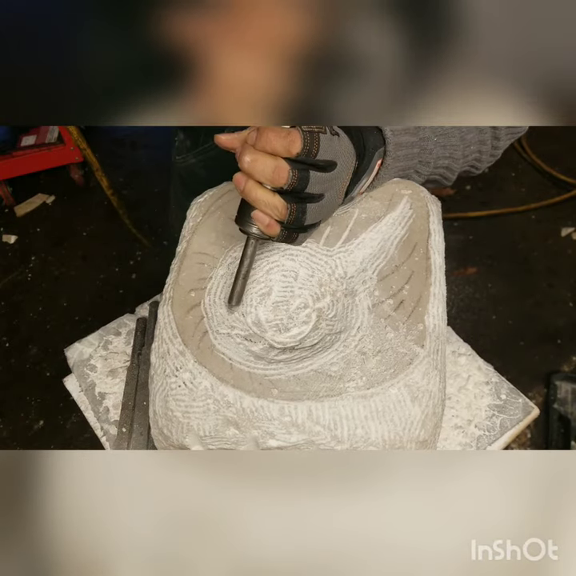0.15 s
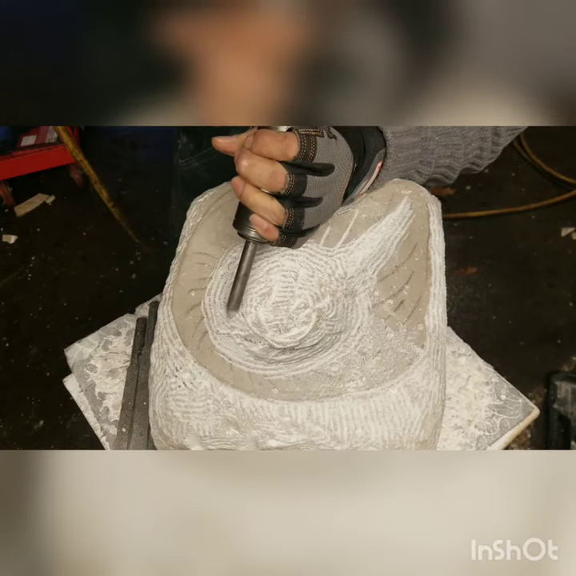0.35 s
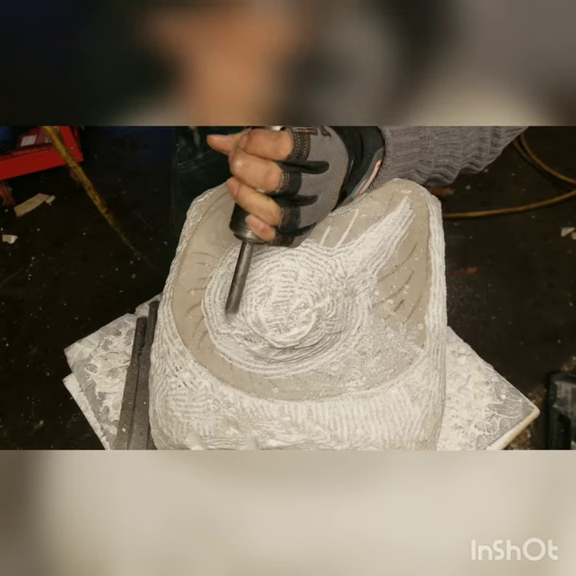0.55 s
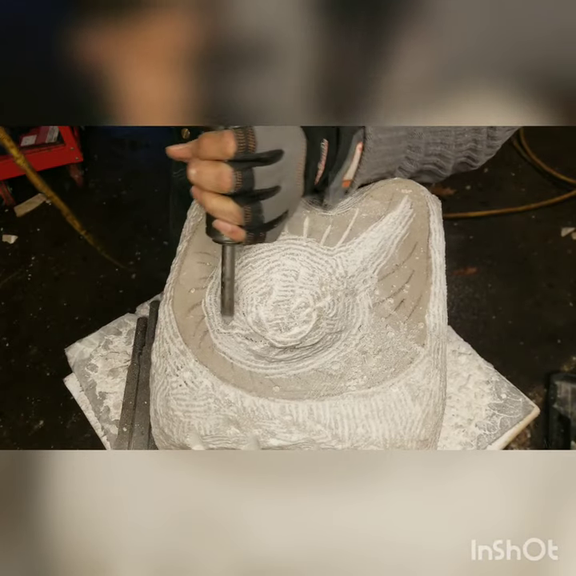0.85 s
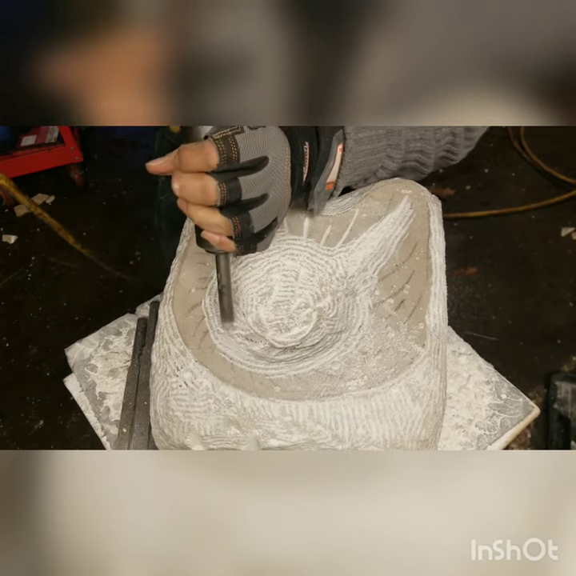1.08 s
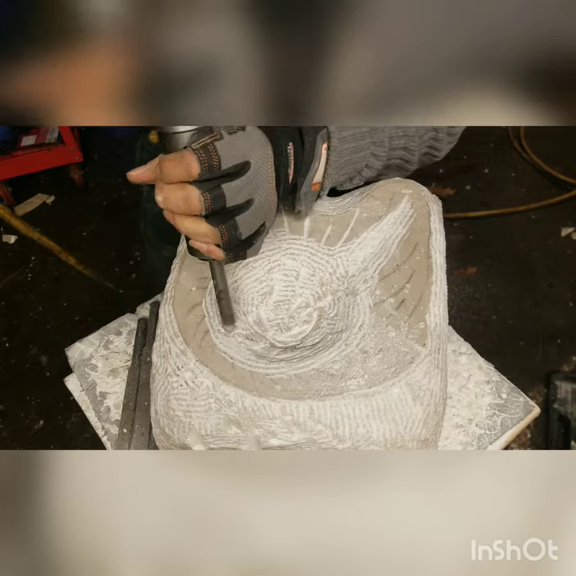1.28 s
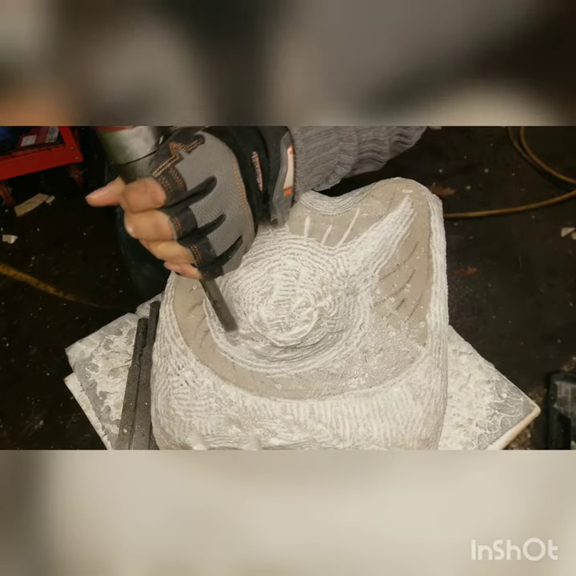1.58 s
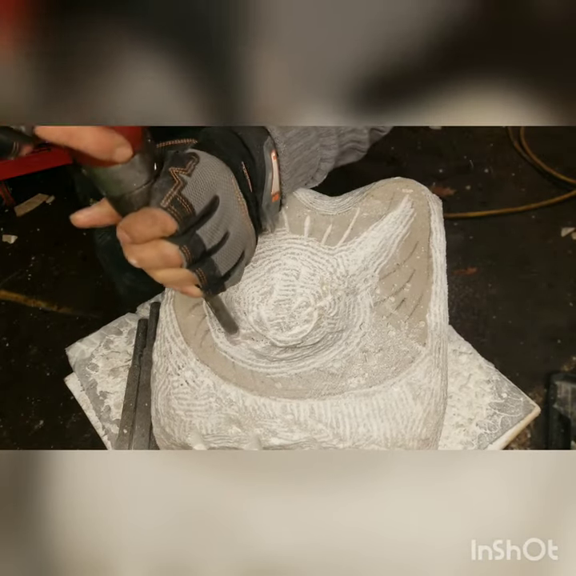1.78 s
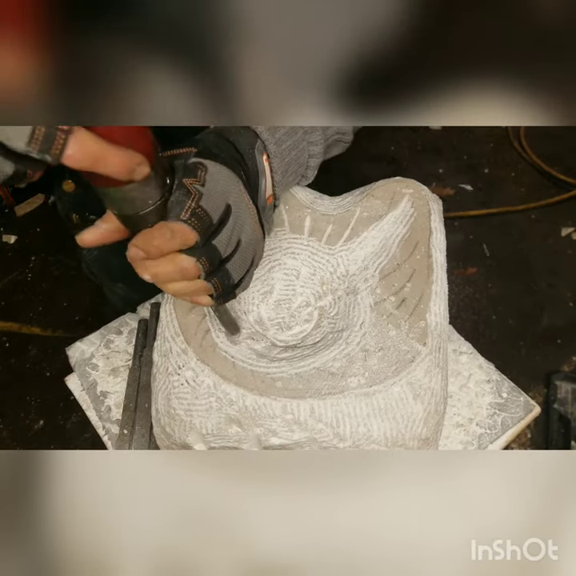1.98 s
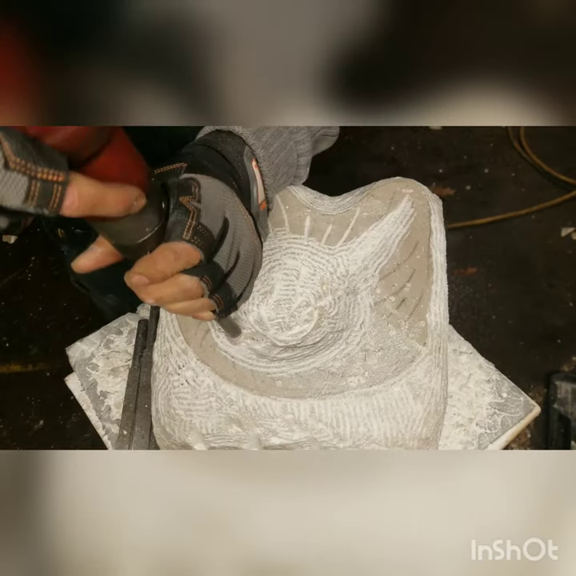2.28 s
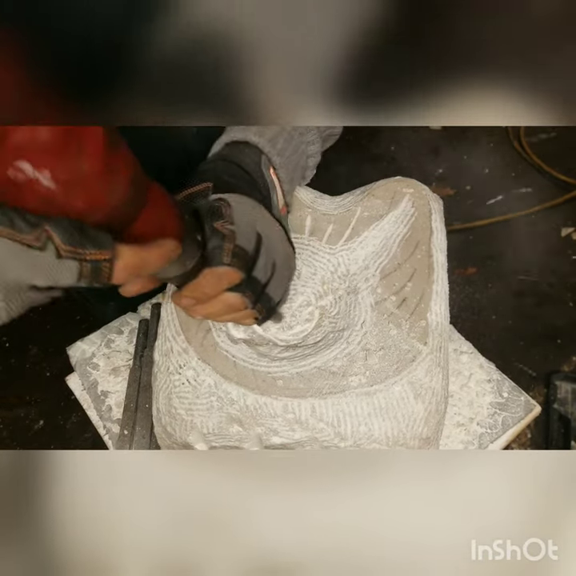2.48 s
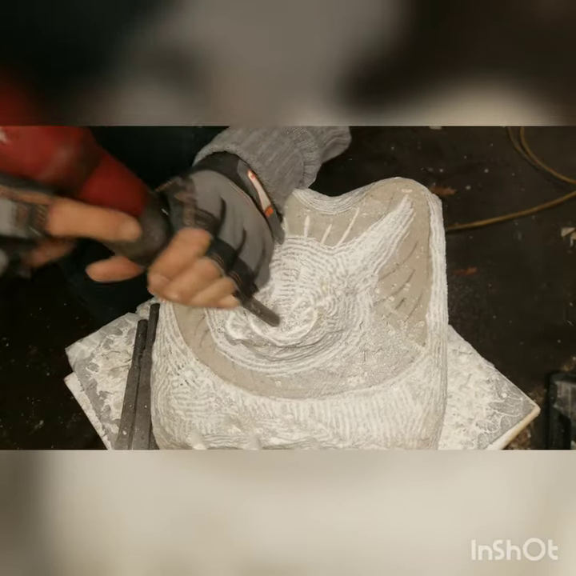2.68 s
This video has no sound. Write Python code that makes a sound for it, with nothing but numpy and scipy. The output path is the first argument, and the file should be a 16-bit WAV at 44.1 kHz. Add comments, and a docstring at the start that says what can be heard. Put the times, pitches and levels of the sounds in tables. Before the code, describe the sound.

A pneumatic hammer drives a steel chisel into stone close by in a small, booming workshop. Two short bursts lead into a longer one, thumping, cracking and ringing over hissing air, before the chisel lifts with a brief scrape.

```python
"""A pneumatic hammer drives a steel chisel into a stone block: three bursts, 23 to 29 blows a second.
It stands nearby in a small, booming workshop, heard through a stereo pair of microphones.
Every blow is a low thump of air, a dry crack of stone and a short, very high ring of steel.
Exhaust air hisses in time with the piston, and at the end the chisel lifts with a tick and a scrape."""
import sys
import numpy as np
from scipy import signal
from scipy.fft import rfft, irfft, next_fast_len
from scipy.io import wavfile

SR = 44100
rng = np.random.default_rng(int(sys.argv[2]) if len(sys.argv) > 2 else 0)


def output_pcm(signal):
    """Save a mono or channel-first signal as 16-bit PCM at the path in sys.argv[1].

    Samples are clipped to [-1, 1] before scaling.
    """
    pcm = np.clip(np.atleast_2d(signal).T, -1, 1) * 32767
    wavfile.write(sys.argv[1], SR, np.round(pcm).astype(np.int16))


N = 125685


def amp(db):
    """Decibels to gain."""
    return 10 ** (np.asarray(db) / 20)


def unit_rms(x):
    """Scale to rms 1."""
    return x / np.sqrt(np.mean(x ** 2) + 1e-20)


def at_hz(points, hz):
    """Read a curve on a log frequency axis."""
    freqs, values = np.transpose(points)
    return np.interp(np.log(hz + 1), np.log(freqs + 1), values)


def at_time(points, s, outside=None):
    """Read a curve over time; its ends hold unless an outside value is given."""
    return np.interp(s, *np.transpose(points), left=outside, right=outside)


def filtered(x, response):
    """Apply a frequency response."""
    size = next_fast_len(N + SR // 2)
    return irfft(rfft(x, size) * response(np.fft.rfftfreq(size, 1 / SR)), size)[..., :N]


def noise(colour, width):
    """Coloured stereo noise of rms 1; width is side over mid."""
    mid, side = filtered(rng.standard_normal((2, N)), lambda hz: amp(at_hz(colour, hz)))
    return unit_rms(np.array([mid + width * side, mid - width * side]))


def add(track, start_s, sound):
    """Mix a sound into a track at a time."""
    start = round(start_s * SR)
    part = track[..., start:start + sound.shape[-1]]
    part += sound[..., :part.shape[-1]]


# The quiet workshop: freq_hz, gain_db
ROOM_TONE_COLOUR = [(20, -24), (70, -2.5), (300, -35), (16000, -54)]

def room_tone(level_db=-68.5):
    """A faint, steady rumble lies under the work."""
    return amp(level_db) * noise(ROOM_TONE_COLOUR, width=0.23)


# Decay of the room: freq_hz, t60_s
REVERB_DECAY = [(260, 0.089), (700, 0.29), (6500, 0.27), (13000, 0.19)]
# What the room sends back to the microphones: freq_hz, gain_db
REVERB_COLOUR = [(100, -23), (280, -2.5), (650, -2), (1100, -4), (3000, -2), (12000, -5.5)]

def workshop_reverb(tool, predelay_s=0.007):
    """The room returns a short diffuse tail that changes as the tool moves."""
    out = np.zeros((2, N))
    for part in np.array_split(np.arange(N), 16):  # each stretch gets its own tail
        hz, t, spectrum = signal.stft(rng.standard_normal((2, SR // 2)), SR, nperseg=256)
        t60 = at_hz(REVERB_DECAY, hz)[:, None]
        decay = amp(at_hz(REVERB_COLOUR, hz)[:, None] - 60 * t / t60)
        equal_energy = np.sqrt(2 * np.log(1000) / (t60 * SR))
        tail = signal.istft(spectrum * decay * equal_energy, SR, nperseg=256)[1]
        add(out, part[0] / SR + predelay_s, signal.fftconvolve(tool[:, part], tail, axes=1))
    return out


# The chisel leaving the block: time_s, level_db
SCRAPE_LEVEL = [(2.73, -71), (2.75, -52.5), (2.785, -55), (2.812, -46), (2.85, -59)]
# Steel rubbing on stone: freq_hz, gain_db
SCRAPE_SPECTRUM = [(500, 9.5), (4000, 9.9), (12000, 8.2)]

def scrape():
    """The chisel slides off the stone with a brief rasp."""
    return amp(at_time(SCRAPE_LEVEL, np.arange(N) / SR, outside=-120)) * noise(SCRAPE_SPECTRUM, width=0.58)


# Air flow at the exhaust: time_s, level_db
EXHAUST_FLOW = [(.18, -77), (.193, -37.5), (.25, -55), (.268, -20.5), (.33, -39), (.38, -70), (.458, -84),
                (.474, -26), (.7, -24.5), (.75, -29.5), (.828, -45.5), (.866, -30.5), (.99, -27.5),
                (1.5, -30.5), (2.33, -25), (2.38, -27.5), (2.51, -23), (2.56, -45)]
# Its hiss: freq_hz, gain_db
EXHAUST_COLOUR = [(200, -20), (900, -2), (1500, -16), (5000, -7), (10000, -2.5), (11700, 4.5), (13300, 3),
                  (15300, 5)]

def exhaust(gain_db=-2, choke_lead_s=0.004, choke_width_s=0.009, choke_depth=0.8):
    """Spent air hisses out; the valve chokes it just before each blow."""
    t = np.arange(N) / SR
    flow = amp(gain_db + at_time(EXHAUST_FLOW, t, outside=-120))
    choke = sum(np.exp(-((t - s + choke_lead_s) / choke_width_s) ** 2) for s, *_ in HAMMER_BLOWS)
    return flow * (1 - choke_depth * choke) * noise(EXHAUST_COLOUR, width=0.65)


# Weight behind the piston's stroke: time_s, level_db
STROKE_WEIGHT = [(.2, -41.5), (.27, -32), (.35, -32.5), (.405, -40.5), (.47, -32.5), (.74, -36),
                 (.9, -31.5), (1.04, -32), (1.2, -32), (2.33, -30), (2.55, -34.5)]
# The piston moves without striking: start_s
EMPTY_STROKES = [.204, .473, .496, .888]
# Low echoes of each thump: delay_s, gain
THUMP_ECHOES = [(.0078, .55), (0.0156, -0.82), (0.0336, -.25)]
# Booming modes of the workshop: pitch_hz, level_db, t60_s
ROOM_MODES = [(93.6, -20, 0.21), (151.5, -11.5, 0.18), (230.63, -12.5, 0.45), (257.6, -23.5, 0.32),
              (292, -13.5, 0.22), (496.3, -23, 0.16)]
# Colour of the thump with its echoes and boom: freq_hz, gain_db
THUMP_SPECTRUM = [(14, -6), (30, -3), (44, 1.5), (88, 5), (125, 4.5), (190, 0), (260, 2.5), (340, 0.5),
                  (430, 2)]

def piston_thumps(gain_db=5, idle_db=-6.5, pulse_hz=203.3, pitch_spread=0.061):
    """Each piston stroke shoves out one pulse of air, which echoes and sets the room booming."""
    def pulse(t, hz):
        squared = (np.pi * hz * t) ** 2
        return (2 * squared - 1) * np.exp(-squared)

    out, t = np.zeros(N), np.arange(-SR // 50, SR // 2) / SR
    boom = sum(amp(db - 60 * abs(t) / t60) * np.sin(2 * np.pi * hz * t) for hz, db, t60 in ROOM_MODES)
    boom *= t > 0
    strokes = [(s, 0) for s, *_ in HAMMER_BLOWS] + [(s, idle_db) for s in EMPTY_STROKES]
    for s, extra_db in strokes:
        db = at_time(STROKE_WEIGHT, s) + extra_db + rng.standard_normal()
        hz = pulse_hz * np.exp(pitch_spread * rng.standard_normal())
        echoes = sum(gain * pulse(t - delay, hz) for delay, gain in THUMP_ECHOES)
        add(out, s + t[0], amp(db + gain_db) * (pulse(t, hz) + echoes + boom))
    return filtered(out, lambda hz: amp(at_hz(THUMP_SPECTRUM, hz)))


# The block answers with a full knock: start_s, level_db
FULL_KNOCKS = [(1.18, -33), (2.498, -34)]

def block_knocks(pressed_db=-5.5, centre_hz=760, width_octaves=0.64, t60_s=0.046):
    """The block knocks dully, the more so the harder the tool is pressed on."""
    envelope, t = np.zeros(N), np.arange(SR // 8) / SR
    pressed = [(s, at_time(STROKE_WEIGHT, s) + pressed_db) for s, *_ in HAMMER_BLOWS]
    for s, db in pressed + list(FULL_KNOCKS):
        add(envelope, s, amp(db - 60 * t / t60_s))
    band = lambda hz: np.exp(-(np.log2((hz + 1) / centre_hz) / width_octaves) ** 2 / 2)
    body = filtered(rng.standard_normal((2, N)), band)
    return envelope * unit_rms(body + body.mean(axis=0))


# Large chips leaving the block: start_s, pitch_hz, level_db
LARGE_CHIPS = [(1.18, 2025, -26), (2.303, 3500, -24.5), (2.371, 3180, -27.5)]

def stone_chips(per_blow=3, small_db=-7.5, small_hz=2384, t60_s=0.016):
    """Every blow breaks off chips, each with its own stony pitch."""
    out, t = np.zeros((2, N)), np.arange(SR // 20) / SR
    small = [(s + 0.002 * abs(lag), small_hz * 2 ** (tone / 2), db + small_db + 2 * size)
             for s, db, _ in HAMMER_BLOWS for lag, tone, size in rng.standard_normal((per_blow, 3))]
    for s, hz, db in small + list(LARGE_CHIPS):
        phase = 2 * np.pi * hz * t + rng.standard_normal((2, 1))
        add(out, s, amp(db - 60 * t / t60_s) * np.sin(phase))
    return out


def grit(depth_db=0.56, grain_s=0.0005):
    """A slight, fast flutter of gain: the stone breaks in tiny chips."""
    grain_index = np.arange(N) / SR / grain_s
    return unit_rms(amp(depth_db * np.interp(grain_index, np.arange(N), rng.standard_normal(N))))


# Blows on the block, which time the whole tool: start_s, crack_db, ring_db
HAMMER_BLOWS = [(0.2141, -38.5, -51), (0.235, -46, -37), (0.262, -30, -27), (0.3024, -25.5, -19),
                (0.347, -30, -20.5), (0.404, -34, -30.5), (0.523, -29, -16), (0.566, -32.5, -15.5),
                (0.606, -30, -24), (0.6497, -32, -22), (0.691, -29.5, -21), (0.736, -31, -24),
                (0.905, -32, -24), (0.945, -29.5, -14.5), (0.9824, -28, -27), (1.0242, -32, -21),
                (1.066, -31.5, -20.5), (1.1047, -29.5, -23.5), (1.14, -31.5, -21.5), (1.181, -29, -22.5),
                (1.219, -30.5, -26), (1.255, -30, -14.5), (1.2888, -31, -22), (1.3253, -33, -24),
                (1.3667, -29.5, -27.5), (1.4017, -32, -25), (1.4374, -28.5, -20.5), (1.481, -32, -20),
                (1.5201, -36, -17.5), (1.5597, -29.5, -18.5), (1.596, -30.5, -23), (1.632, -32, -23.5),
                (1.669, -33, -34), (1.704, -29, -18.5), (1.747, -31, -30), (1.784, -33, -25.5),
                (1.819, -35, -33), (1.8533, -30.5, -35), (1.888, -31.5, -46), (1.9225, -29.5, -22),
                (1.9578, -33, -44), (1.9925, -34, -44), (2.027, -29, -26.5), (2.0624, -35, -38),
                (2.0961, -33, -33), (2.131, -34.5, -39), (2.1662, -32, -50), (2.1991, -33.5, -32),
                (2.234, -30, -35), (2.267, -29.5, -30), (2.3031, -35, -41), (2.3367, -26, -20.5),
                (2.373, -29, -16.5), (2.4137, -31.5, -24.5), (2.456, -30, -23), (2.499, -27.5, -24),
                (2.5415, -31.5, -29)]
# Light touches of the tool: start_s, level_db
TOOL_TICKS = [(.114, -65), (2.769, -46)]
# Breaking stone: freq_hz, gain_db
STONE_COLOUR = [(200, -18), (600, -0.5), (1500, -5.5), (2200, 0.5), (3600, -2.5), (5200, -1.5), (7500, 4),
                (10000, 2.5), (15300, 0)]

def stone_cracks(gain_db=5, lead_db=0.5, lead_s=0.0011,
                 snap_db=-0.5, snap_t60_s=0.0071, crumble_t60_s=0.047):
    """The edge bites: a brief lead-in, a hard snap, then crumbling stone."""
    envelope, t = np.zeros(N), np.arange(-SR // 100, SR // 10) / SR
    lead_in = amp(lead_db) * np.exp(-abs(t) / lead_s)
    snap = amp(snap_db - 60 * abs(t) / snap_t60_s)
    crumble = amp(-60 * abs(t) / crumble_t60_s)
    shape = np.where(t < 0, lead_in, snap + crumble)
    for s, db, *_ in list(HAMMER_BLOWS) + list(TOOL_TICKS):
        add(envelope, s + t[0], amp(db + gain_db) * shape)
    return envelope * grit() * noise(STONE_COLOUR, width=0.9)


# Longer tones of the steel: pitch_hz, level_db, t60_s
STEEL_MODES = [(4567, -11.5, 0.1), (5880, -16, 0.13), (10900, -14, 0.062)]
# Swell of those tones: time_s, gain_db
MODE_SWELL = [(1.7, 4), (2.1, 10.5), (2.45, 3)]
# Crowded high modes of the steel: freq_hz, gain_db
SHIMMER_COLOUR = [(5000, -34), (10100, -9.5), (10750, 15.5), (11800, 13), (14300, 4.5), (15500, 0.5)]

def chisel_ring(clink_db=10, clink_hz=11750, spread_hz=400, clink_t60_s=0.011,
                shimmer_db=7.5, shimmer_t60_s=0.022, attack_s=0.0018):
    """Struck steel: a clink whose pitch shifts with the contact, a shimmer and a few longer tones."""
    out, shimmer, t = np.zeros((2, N)), np.zeros(N), np.arange(SR // 8) / SR
    rise = 1 - np.exp(-t / attack_s)
    for s, _, ring_db in HAMMER_BLOWS:
        pitch_hz = clink_hz + spread_hz * rng.standard_normal()
        drift = 0.12 * np.cumsum(rng.standard_normal(len(t)))  # wandering phase blurs each tone
        phase = 2 * np.pi * pitch_hz * t + drift + rng.normal(0, 0.17, (2, 1))
        ring = amp(ring_db + clink_db - 60 * t / clink_t60_s) * np.sin(phase)
        drive_db = at_time(STROKE_WEIGHT, s) + at_time(MODE_SWELL, s)
        for hz, mode_db, t60 in STEEL_MODES:
            phase = 2 * np.pi * (hz * t + rng.random((2, 1))) + drift
            ring += amp(drive_db + mode_db + rng.normal(0, 2) - 60 * t / t60) * np.sin(phase)
        add(out, s, ring * rise)
        add(shimmer, s, amp(ring_db + shimmer_db - 60 * t / shimmer_t60_s) * rise)
    return out + shimmer * noise(SHIMMER_COLOUR, width=0.17)


def scene():
    """The hammer at work in its room, over a faint rumble."""
    tool = piston_thumps() + stone_cracks() + stone_chips() + block_knocks() + chisel_ring()
    tool += exhaust() + scrape()
    return tool + workshop_reverb(tool) + room_tone()


# Left microphone against right: freq_hz, left_minus_right_db
MIC_BALANCE = [(200, 3), (700, 4), (4500, 1.5), (7000, 2), (11700, -3), (15600, 5.5)]
# Top end of both microphones: freq_hz, gain_db
MIC_ROLL_OFF = [(15700, 0), (16000, -25), (16600, -32)]

def record(dry, left_lead_s=0.00009, top_hz=16800):
    """The two microphones differ in colour, the left hears the bass first, and the top falls steeply."""
    sides = np.array([[0.5], [-0.5]])
    colour = lambda hz: amp(at_hz(MIC_BALANCE, hz) * sides + at_hz(MIC_ROLL_OFF, hz))
    lead = lambda hz: np.exp(2j * np.pi * np.minimum(hz, 600) * left_lead_s * sides)
    return filtered(dry, lambda hz: colour(hz) * lead(hz) * (hz < top_hz))


dry = scene()
out = record(dry)
output_pcm(out)
```